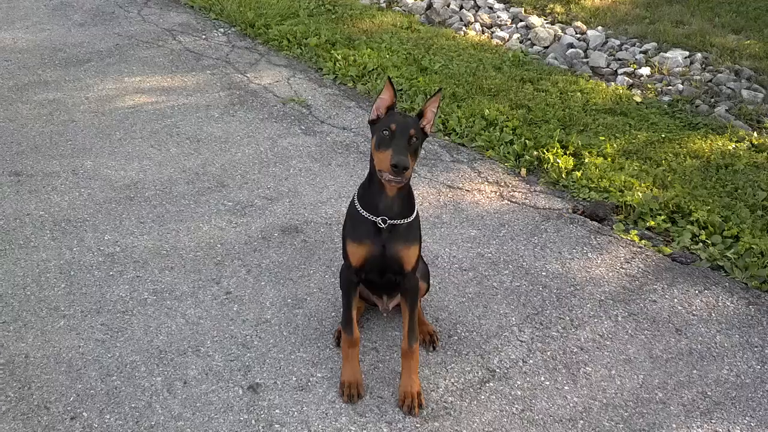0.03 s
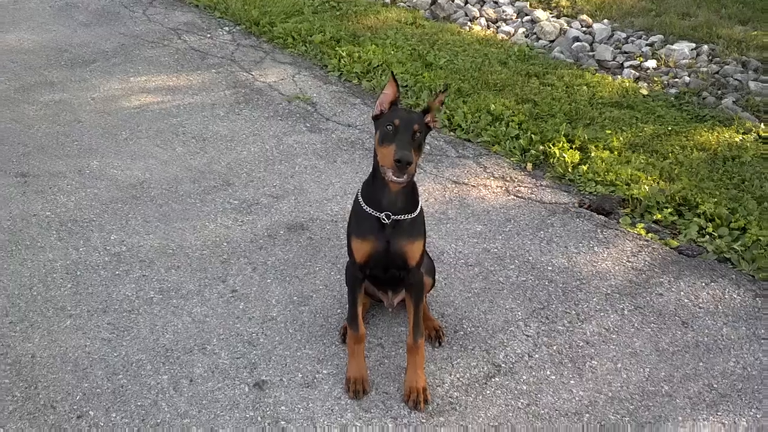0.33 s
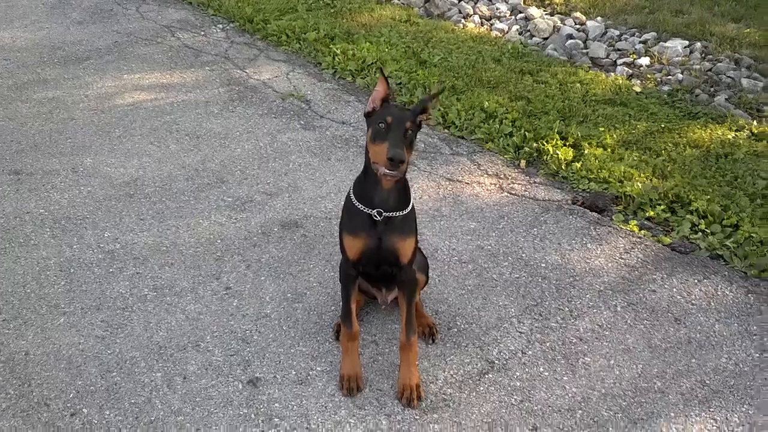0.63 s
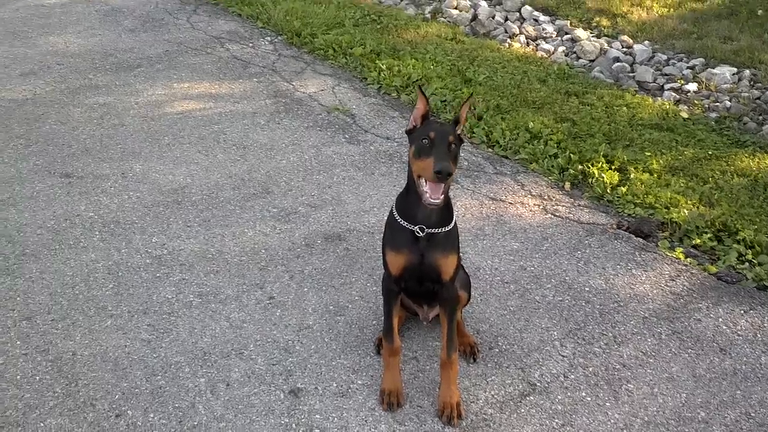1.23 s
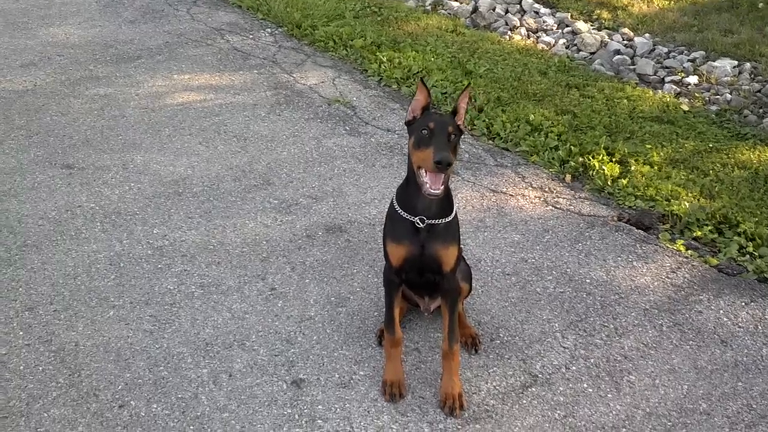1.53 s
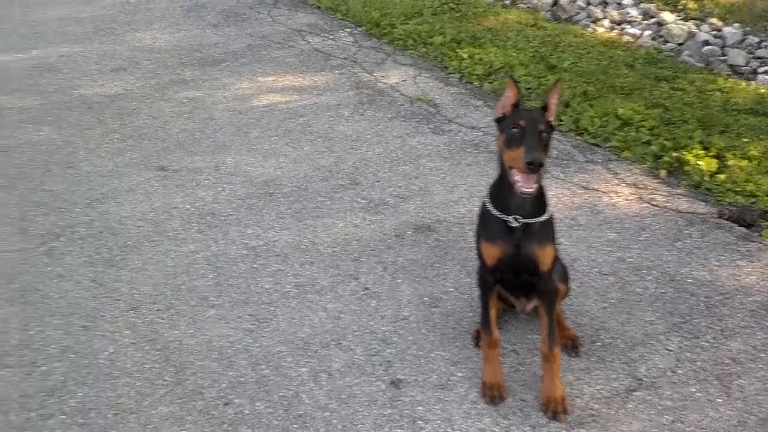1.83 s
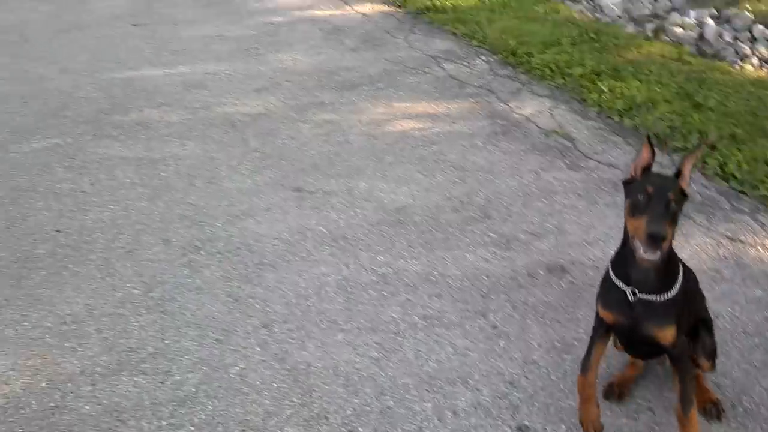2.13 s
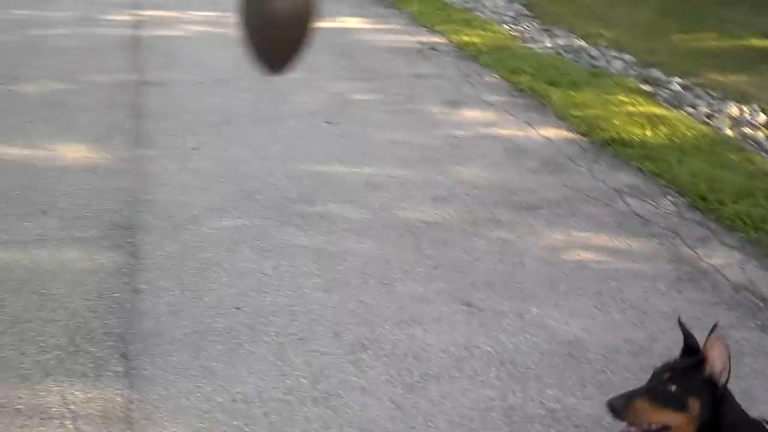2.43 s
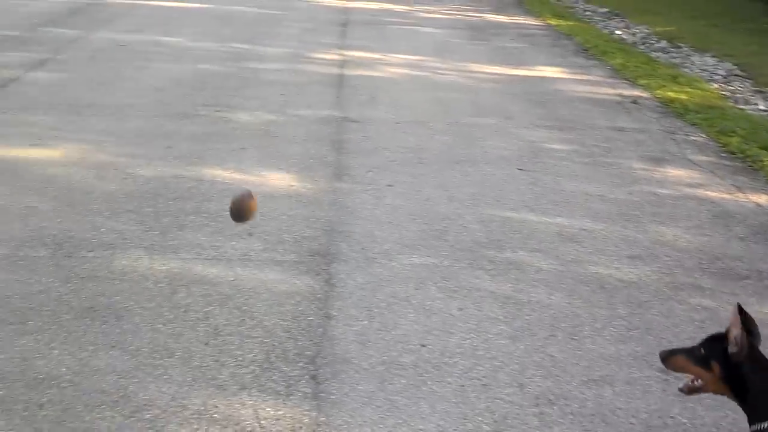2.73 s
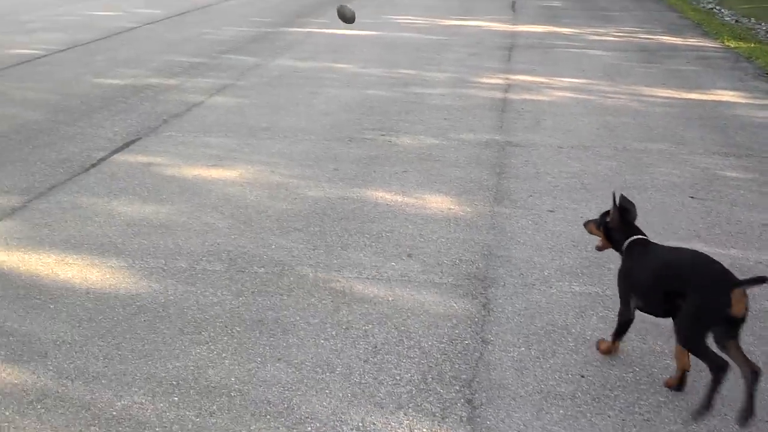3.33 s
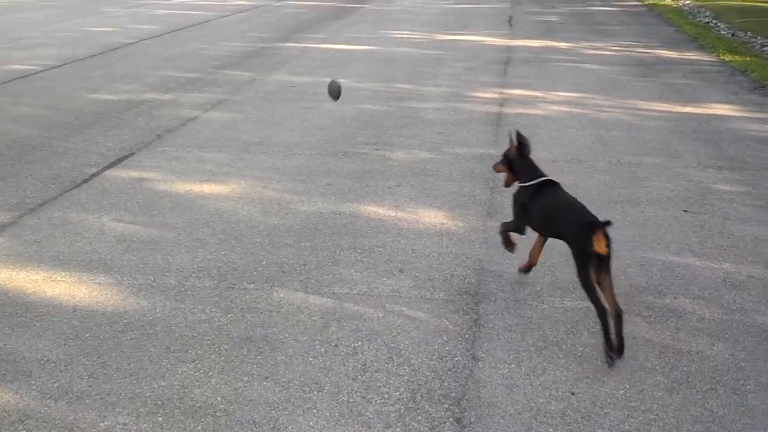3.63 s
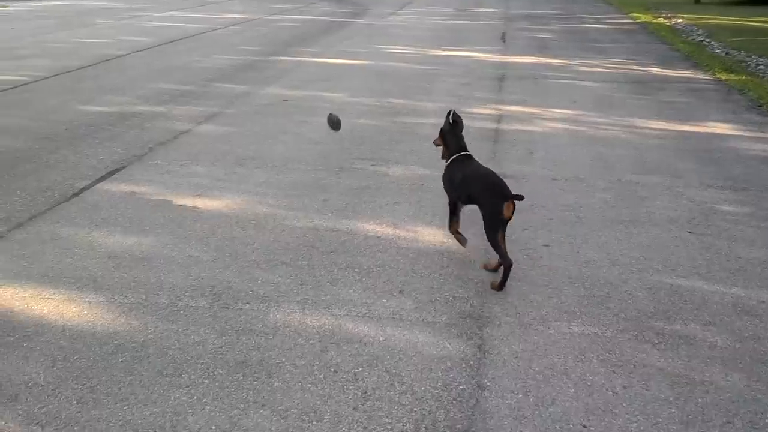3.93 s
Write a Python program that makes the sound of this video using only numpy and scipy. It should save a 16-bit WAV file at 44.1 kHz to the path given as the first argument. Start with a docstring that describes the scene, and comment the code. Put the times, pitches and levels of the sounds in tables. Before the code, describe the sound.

A thrown rubber ball slaps the pavement twice, with a puppy's claws tapping after it.

```python
"""A paved drive, with distant traffic, a breeze, far birds and insects chirping in the verge.
A hollow rubber ball bumps in the hand, is thrown and bounces twice: each landing slaps, crushes grit
and sets the shell ringing. A puppy starts after it, pads scuffing, claws tapping and the steel links
of its collar tinkling. The camera's stereo widening gives everything a slightly hollow colour."""
import sys
import numpy as np
from scipy import signal
from scipy.fft import rfft, irfft, next_fast_len
from scipy.io import wavfile
from scipy.ndimage import map_coordinates

SR = 44100
rng = np.random.default_rng(int(sys.argv[2]) if len(sys.argv) > 2 else 0)


def put_to_file(sound):
    """Save the sound as 16-bit audio at rate SR, in the file named by the first command-line argument."""
    columns = np.atleast_2d(sound).T  # one column per channel
    safe = np.clip(columns, -1, 1)
    whole_steps = np.round(safe * 32767)
    wavfile.write(sys.argv[1], SR, whole_steps.astype(np.int16))


N = 176400


def amp(db):
    """Decibels to gain."""
    return 10 ** (np.asarray(db) / 20)


def unit(x):
    """Scale to rms 1."""
    return x / np.sqrt(np.mean(x ** 2) + 1e-20)


def along(points, hz):
    """Read a curve of (f/Hz, value) points on a log frequency axis."""
    f, v = np.transpose(points)
    return np.interp(np.log(hz + 1), np.log(f + 1), v)


def clock(start=0):
    """Seconds since start, zero before it."""
    return np.maximum(np.arange(N) / SR - start, 0)


def wobble(rate):
    """A smooth random modulator, rate knots a second."""
    return map_coordinates(rng.standard_normal(int(N * rate / SR) + 4), [np.arange(N) * rate / SR])


def filtered(x, response):
    """EQ x with a gain given as a function of frequency."""
    m = next_fast_len(N + SR // 4)
    return irfft(rfft(x, m) * response(np.fft.rfftfreq(m, 1 / SR)), m)[..., :N]


def noise(spectrum):
    """Stereo noise of rms 1 with the given colour."""
    return unit(filtered(rng.standard_normal((2, N)), lambda f: amp(along(spectrum, f))))


def narrow(centre_hz, width_hz):
    """Stereo narrow-band noise of rms 1."""
    white = rng.standard_normal((2, N))
    return unit(filtered(white, lambda f: 1 / (1 + ((f - centre_hz) / width_hz) ** 4)))


def gritty(spectrum, scatter_db=6.5):
    """Stereo crackle of rms 1: grains of very unequal size with the given colour."""
    grains = rng.standard_normal((2, N)) * amp(scatter_db * wobble(4000))
    return unit(filtered(grains, lambda f: amp(along(spectrum, f))))


def pan(db):
    """Left and right gains for a level difference; positive is left."""
    return amp(np.array([[db], [-db]]) / 2)


def decay(t, t60):
    """A hard attack that dies by 60 dB in t60."""
    return (t > 0) * np.exp(-np.minimum(np.log(1000) * t / t60, 40))


def ring(t, hz, t60):
    """One damped mode."""
    return np.sin(2 * np.pi * hz * t) * decay(t, t60)


# colour of the outdoor wash, mid and side (f/Hz, density/dB)
WASH_MID = [(25, -38), (50, -49), (80, -8), (130, 0), (190, 1.5), (300, -5), (600, -6), (900, -8.5),
            (1400, -17), (2200, -18.5), (3500, -27), (6500, -32), (10500, -37.5), (15500, -35.5)]
WASH_SIDE = [(25, -33), (50, 1), (80, -7.5), (130, -0.5), (220, -3.5), (350, -7), (600, -10.5), (1000, -13),
             (2000, -16.5), (3000, -26), (5500, -31), (8300, -31.5), (11000, -38.5), (15000, -34)]
# faint wavering tones in the background (f/Hz, level/dB re the wash)
FAINT_TONES = [(178, -16.5), (455, -21.5), (680, -15.5)]


def traffic():
    """A wide wash of far traffic and air, with faint wavering tones in the background."""
    colours = lambda f: amp([along(WASH_MID, f), along(WASH_SIDE, f)])
    mid, side = filtered(rng.standard_normal((2, N)), colours)
    out = unit(np.array([mid + side, mid - side])) * amp(0.19 * wobble(7.5))
    for hz, db in FAINT_TONES:
        swell = amp(db + 4.2 * wobble(4.66))
        out += swell * np.sqrt(2) * np.sin(2 * np.pi * hz * clock() + 0.6 * wobble(9))
    return out


# colour of the wind rumble (f/Hz, density/dB)
BREEZE_COLOUR = [(25, -24), (55, -19.5), (90, -2), (250, 0), (400, -16), (900, -35)]


def breeze(level_db=-9.5, gust_db=3):
    """Low flutter of moving air, different on each side."""
    return amp(level_db) * unit(noise(BREEZE_COLOUR) * amp(gust_db * np.array([wobble(17), wobble(14)])))


# bird notes (t/s, f/Hz, level/dB re the wash)
BIRD_NOTES = [(.36, 2390, -8), (.41, 4450, -20.5)]


def birds(width_hz=62, swell_s=0.014):
    """Short soft peeps from far away, each a swell of narrow-band noise."""
    return sum(amp(db) * narrow(hz, width_hz) * np.exp(-.5 * ((clock() - s) / swell_s) ** 2)
               for s, hz, db in BIRD_NOTES)


def chirp(s, hz, swell_s=0.042, width_hz=160, sag_hz_per_s=1200):
    """One soft, slightly rasping insect note, centred on time s and sagging in pitch."""
    t = clock() - s
    live = np.abs(t) < 4 * swell_s
    out, t = np.zeros(N), t[live]
    knots = (t - t[0]) * 2 * width_hz
    rasp_cos, rasp_sin = (map_coordinates(row, [knots]) for row in rng.standard_normal((2, 128)))
    phase = 2 * np.pi * (hz - sag_hz_per_s * t / 2) * t
    out[live] = (rasp_cos * np.cos(phase) + rasp_sin * np.sin(phase)) * np.exp(-.5 * (t / swell_s) ** 2)
    return out


# one-off chirps (t/s, f/Hz, level/dB re the wash)
SINGLE_CALLS = [(.24, 8350, -18), (2.68, 8300, -18), (3.365, 8900, -22)]
# repeating insects (start/s, stop/s, period/s, f/Hz, level/dB re the wash, pan/dB)
REPEATING_CALLS = [(0.338, 2.7, .2815, 8920, -21, 2), (0.145, 2.7, .303, 9500, -26.5, 2.5),
                   (1.475, 2.6, 0.326, 7560, -24.5, -1), (0.735, 3.6, 0.39, 8150, -27, 5)]


def insects(scatter_db=1.7):
    """Each insect repeats a high chirp at its own pace, uneven in level; a few call only once."""
    stereo_chirp = lambda s, hz: np.array([chirp(s, hz), chirp(s, hz)])
    out = sum(amp(db) * stereo_chirp(s, hz) for s, hz, db in SINGLE_CALLS)
    for start, stop, period, hz, db, pan_db in REPEATING_CALLS:
        for s in np.arange(start, stop, period):
            out += amp(db + rng.normal(0, scatter_db)) * pan(pan_db) * stereo_chirp(s, hz)
    return out


# fader ride of the ambience bed, before its trim (t/s, level/dB)
BED_FADER = [(.07, -61.5), (.3, -60), (.65, -56), (1.0, -53.5), (1.4, -49.5), (2.1, -49), (2.88, -49),
             (3.02, -53.5), (3.3, -52), (3.7, -49.5), (3.86, -50.5), (3.95, -52)]


def ambience(trim_db=2.5):
    """Traffic, breeze, birds and insects swell and dip together on one fader."""
    fader_db = np.interp(clock(), *np.transpose(BED_FADER))
    return amp(fader_db + trim_db) * (traffic() + breeze() + birds() + insects())


# chain clinks (t/s, level/dB)
CHAIN_HITS = [(3.437, -62), (3.46, -59), (3.485, -60), (3.865, -54.5), (3.892, -54), (3.914, -59)]


def collar(link_hz=10190, width_hz=350, t60=0.12):
    """Small steel links knock together and ring at nearly the same pitch."""
    return narrow(link_hz, width_hz) * sum(amp(db) * decay(clock(s), t60) for s, db in CHAIN_HITS)


# colour of a stone grain's snap (f/Hz, density/dB)
GRAIN_COLOUR = [(1500, 3), (4000, 5), (7000, 2), (10000, 2), (15500, -18)]
# grain hits (t/s, level/dB)
GRAIN_HITS = [(2.339, -38.5), (2.3605, -45), (2.695, -45), (2.906, -40), (2.9295, -36), (3.7702, -34),
              (3.7732, -33), (3.786, -43), (3.811, -39), (3.8242, -40), (3.8423, -37), (3.894, -44),
              (3.9705, -47), (3.9828, -35), (3.988, -44)]


def flicked_grit(t60=0.005, side_db=-3.5):
    """Single grains snap against the paving, nearly straight ahead."""
    mid, side = gritty(GRAIN_COLOUR) * amp([[0], [side_db]])
    snaps = sum(amp(db) * decay(clock(s), t60) for s, db in GRAIN_HITS)
    return np.array([mid + side, mid - side]) * snaps


# dull colour of the paving, for claws, pads and the reverb tail (f/Hz, density/dB)
PAVING_COLOUR = [(150, 7.5), (500, 8.5), (1000, 1.5), (2200, -1), (4000, -9.5), (6500, -10), (10000, -21.5),
                 (15500, -24)]
# claw hits (t/s, level/dB, f/Hz, t60/s, grit/dB, pan/dB)
CLAW_HITS = [(2.9082, -41, 970, 0.024, -41, 0), (3.391, -39, 950, 0.013, -52, 3),
             (3.7698, -27, 1240, 0.013, -32, -2), (3.7731, -23.5, 2020, 0.0061, -24, -3),
             (3.7733, -27, 560, 0.012, -45, -4), (3.8415, -19.5, 846, 0.016, -31, 1),
             (3.9833, -35, 1187, 0.031, -33, 6.5)]


def claws(attack_s=0.0004, grit_t60=0.014):
    """Each claw strikes the paving with a pitched tick and a puff of grit."""
    out, paving = np.zeros((2, N)), noise(PAVING_COLOUR)
    for s, db, hz, t60, grit_db, pan_db in CLAW_HITS:
        t = clock(s)
        tick = amp(db) * ring(t, hz, t60) * (1 - np.exp(-t / attack_s))
        grit = amp(grit_db) * paving * decay(t, grit_t60)
        out += pan(pan_db) * (tick + grit)
    return out


# pad scuffs, dry rustles of dog and handler, swishes of throw and leap (t/s, length/s, level/dB)
PAD_STROKES = [(3.185, 0.071, -51.5), (3.765, 0.113, -43.5)]
RUSTLE_STROKES = [(2.322, 0.037, -55), (2.685, 0.035, -58), (2.878, 0.043, -56.5), (3.79, 0.088, -55.5)]
SWISH_STROKES = [(2.262, 0.037, -54), (2.3, 0.05, -53.5), (3.275, 0.047, -58)]
# colours of the dry rustle and the thin swish (f/Hz, density/dB)
RUSTLE_COLOUR = [(1000, -9), (4000, 5.5), (7000, 1), (10000, 6.5), (13000, -4), (15500, -0.5)]
SWISH_COLOUR = [(3000, -22), (8000, -10), (12000, -3.5), (15500, 3.5)]


def movement(edge_s=0.012, grain_db=2):
    """Pads scrape, bodies rustle, the throw and the leap swish: short strokes of grainy noise."""
    out = np.zeros((2, N))
    layers = (PAD_STROKES, PAVING_COLOUR), (RUSTLE_STROKES, RUSTLE_COLOUR), (SWISH_STROKES, SWISH_COLOUR)
    for strokes, colour in layers:
        pressure = sum(amp(db) * np.clip(np.minimum(clock(s), length - clock(s)) / edge_s, 0, 1)
                       for s, length, db in strokes)
        out += pressure * unit(gritty(colour) * amp(grain_db * wobble(500)))
    return out


def hum(peak_s=2.451, swell_s=0.018, hz=456, level_db=-34, pan_db=16):
    """A hollow tone swells and fades on the left just after the throw."""
    t = clock()
    swell = (1 + ((t - peak_s) / swell_s) ** 2) ** -1.1
    return amp(level_db) * pan(pan_db) * np.sin(2 * np.pi * hz * t) * swell


# modes of the rubber shell (f/Hz, level/dB, t60/s)
SHELL_MODES = [(232, -7, 0.08), (319, -1, 0.075), (376.6, 0.5, 0.064), (449, -0.5, 0.074), (554, -2, 0.021),
               (723, -5.5, 0.042), (940, -6.5, 0.03), (1660, -15, 0.024), (1856, -9.5, 0.025)]


def shell(start, eq_db, pivot_hz=427, attack_s=0.00066):
    """The ball rings after one contact; eq_db weights each mode by its octaves above the pivot."""
    t = clock(start)
    live = (t > 0) & (t < .5)
    out, t = np.zeros((2, N)), t[live]
    attack = 1 - np.exp(-t / attack_s)
    for hz, db, t60 in SHELL_MODES:
        phase = rng.standard_normal((2, 1))  # reaches the two sides a little out of step
        gain = amp(db + eq_db(np.log2(hz / pivot_hz)))
        out[:, live] += gain * np.sin(2 * np.pi * hz * t + phase) * decay(t, t60) * attack
    return out


def thud(start, hz=231.5, rise_s=0.0037):
    """A few slow cycles as the whole ball lurches."""
    t = clock(start)
    rise = t / rise_s
    return np.sin(2 * np.pi * hz * t) * rise * np.exp(1 - rise)


# bumps on the ball in the hand (t/s, level/dB, pan/dB)
HAND_HITS = [(0.2796, -36.5, -7), (2.3326, -19, -8.5), (2.341, -20, -4)]


def hand_bumps(width_octaves=0.19, attack_s=0.0011, thud_db=-13):
    """A soft bump rings the ball in a narrow band near 430 Hz, over a dull thud as it gives way."""
    band_eq = lambda octaves: -6 * (octaves / width_octaves) ** 2
    out = np.zeros((2, N))
    for s, db, pan_db in HAND_HITS:
        tone = shell(s, band_eq) * (1 - np.exp(-clock(s) / attack_s))
        out += amp(db) * pan(pan_db) * (tone + amp(thud_db) * thud(s))
    return out


def slap(start, hz=616, rise_s=0.00071, right_lag_s=0.00012):
    """A pop of about two cycles as the ball flattens on the ground."""
    t = np.array([clock(start), clock(start + right_lag_s)])
    rise = t / rise_s
    return -np.sin(2 * np.pi * hz * t) * rise * np.exp(1 - rise)


def rebound(contact, flex_s, tilt, thud_db=-5, loss_db=7.5, dull_db_per_octave=5):
    """The ball thuds off the ground and flexes back into shape, ringing weaker and duller each time."""
    out = amp(thud_db) * thud(contact + flex_s)
    for k in range(3):
        flex_eq = lambda octaves: (tilt - k * dull_db_per_octave) * max(octaves, 0)
        out = out + amp(-k * loss_db) * shell(contact + (k + 1) * flex_s, flex_eq)
    return out


# modes of stone pinched under the ball (f/Hz, level/dB, t60/s)
STONE_MODES = [(1900, -2, .004), (5000, -12, .0015), (7000, -9, .0015), (10000, 0, .0028), (15600, 5, .002)]
# colour of crushed grit (f/Hz, density/dB)
CRUNCH_COLOUR = [(300, -3), (1700, 11.5), (3000, -1.5), (4500, -5.5), (7000, -11), (9800, -3),
                 (12000, -0.5), (15000, -2.5)]
# landings (t/s, slap/dB, grit/dB, high cut/Hz, ring/dB, flex/s, rebound/dB, tilt/dB per octave, pan/dB)
LANDINGS = [(2.9244, -11.5, -22.5, 16400, -23, 0.0072, -19.5, 0, 4),
            (3.8796, -18, -27.5, 11500, -31, .011, -31.5, -8.5, 3.5)]


def bounces(crack_db=-25.5, crush_t60=0.0068, scatter_db=-12.5, scatter_t60=0.072):
    """The ball lands with a crack of stone and a crunch of grit, slaps, rings and rebounds."""
    out, grit = np.zeros((2, N)), noise(CRUNCH_COLOUR)
    for s, slap_db, grit_db, top_hz, ring_db, flex_s, rebound_db, tilt, pan_db in LANDINGS:
        t = clock(s)
        high_cut = lambda f: 1 / (1 + (f / top_hz) ** 12)
        crack = sum(amp(db) * high_cut(hz) * ring(t, hz, t60) for hz, db, t60 in STONE_MODES)
        crush_and_scatter = decay(t, crush_t60) + amp(scatter_db) * decay(t, scatter_t60)
        crunch = filtered(grit, high_cut) * crush_and_scatter
        contact_eq = lambda octaves: tilt * octaves + 4.5 * min(octaves, 1)  # brighter than the rebound
        body = amp(slap_db) * slap(s) + amp(ring_db) * shell(s, contact_eq)
        body += amp(rebound_db) * rebound(s, flex_s, tilt)
        out += pan(pan_db) * body + amp(grit_db) * crunch + amp(crack_db) * crack
    return out


def reflections(x, echo_s=0.0375, echo_db=-26, tail_t60=0.46, tail_db=-29.5):
    """One faint slapback from a distant wall and a weak, dull outdoor tail."""
    echo = filtered(x, lambda f: np.exp(-2j * np.pi * f * echo_s))
    impulse = (noise(PAVING_COLOUR) * decay(clock(), tail_t60))[:, :SR // 2]
    tail = signal.fftconvolve(x, impulse / np.linalg.norm(impulse[0]), axes=1)[:, :N]
    return amp(echo_db) * echo + amp(tail_db) * tail


def scene(low_cut_hz=172):
    """Ball and dog up front, with no deep bass, over the ambience bed."""
    low_cut = signal.butter(3, low_cut_hz, "highpass", fs=SR, output="sos")
    action = bounces() + hand_bumps() + hum() + claws() + movement() + flicked_grit() + collar()
    near = signal.sosfilt(low_cut, action)
    return near + reflections(near) + ambience()


# stereo widener: how much of the opposite side is subtracted (f/Hz, share/0-1)
WIDENER = [(400, 0.02), (800, 0.53), (1350, 0.86), (3000, 1), (16000, 1)]


def record(dry, delay_s=16 / SR, open_s=0.062, fade_s=0.017, top_hz=16300):
    """The camera widens by subtracting a delayed copy of the other side, fades in and cuts the top."""
    crossfeed = lambda f: np.clip(along(WIDENER, f), 0, 1) * np.exp(-2j * np.pi * f * delay_s)
    wide = dry - filtered(dry[::-1], crossfeed)
    fade_in = np.clip(clock(open_s) / fade_s, 0, 1)
    return filtered(wide * fade_in, lambda f: f < top_hz)


dry = scene()
out = record(dry)
put_to_file(out)
```